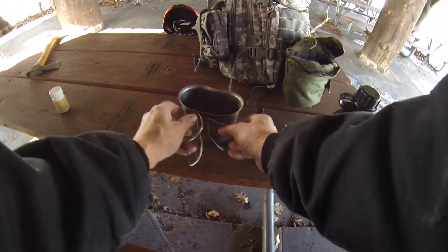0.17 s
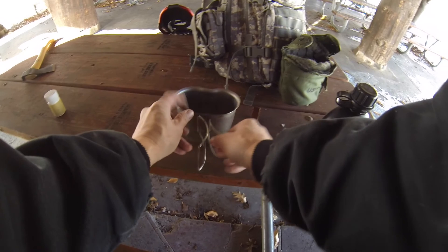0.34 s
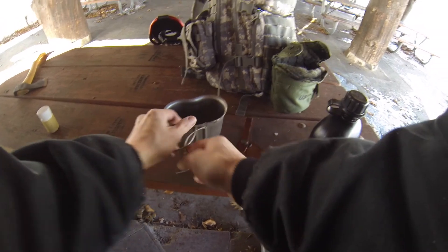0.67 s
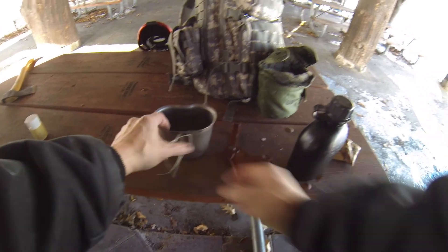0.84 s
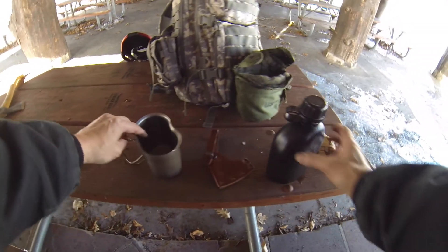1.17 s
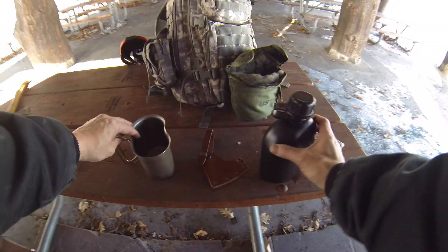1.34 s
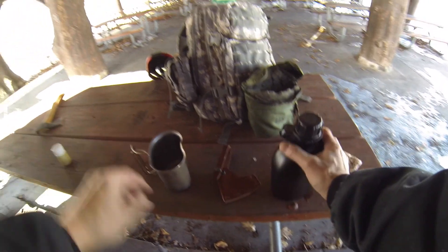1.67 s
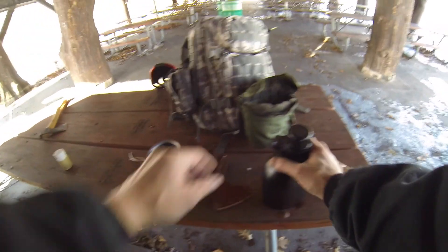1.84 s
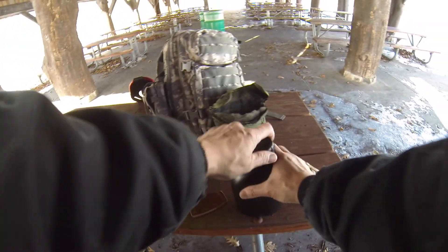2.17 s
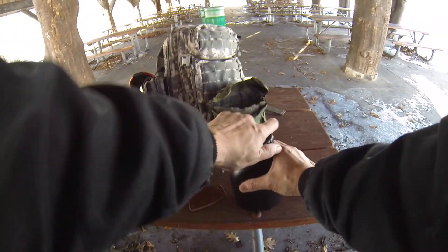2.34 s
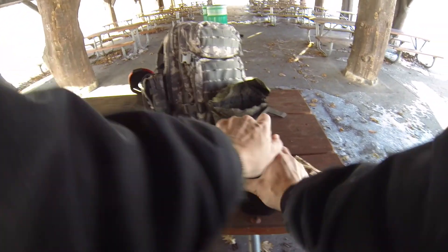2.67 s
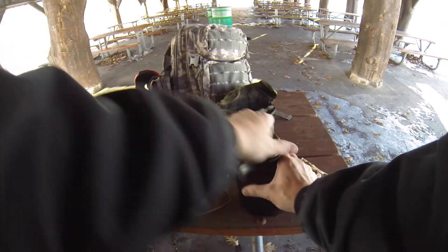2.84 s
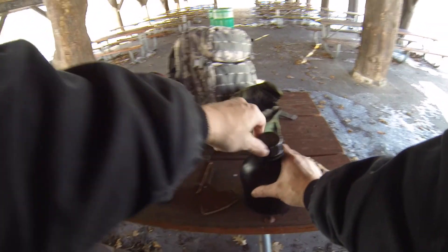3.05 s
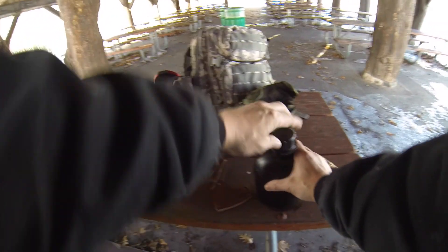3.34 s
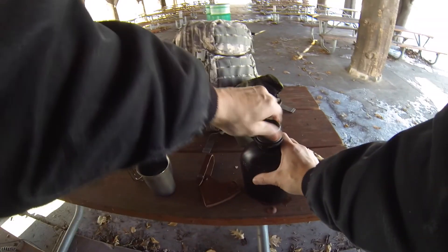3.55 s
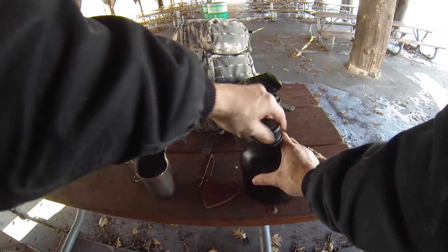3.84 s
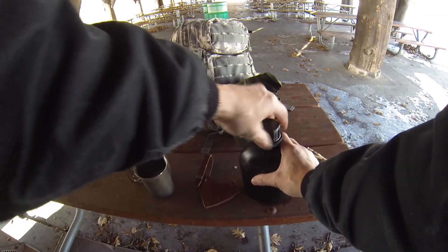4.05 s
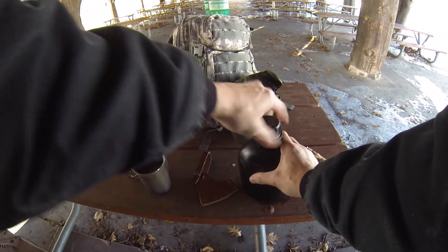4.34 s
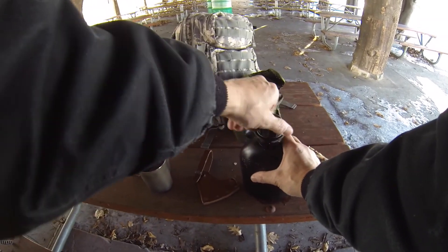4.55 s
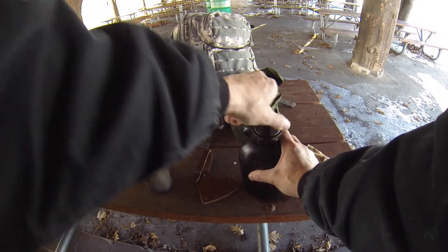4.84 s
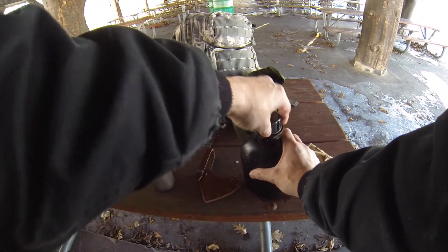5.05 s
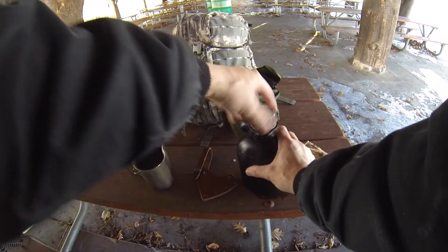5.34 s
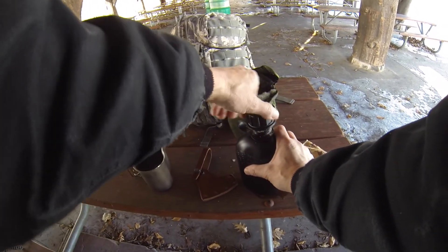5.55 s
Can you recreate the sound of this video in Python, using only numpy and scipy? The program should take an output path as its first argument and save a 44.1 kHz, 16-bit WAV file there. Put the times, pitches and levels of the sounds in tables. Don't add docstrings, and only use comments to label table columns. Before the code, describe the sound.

A metal cup's wire handles clank and scrape, the cup and a full canteen thud onto wood, then a plastic cap cracks loose and is twisted off.

```python
import sys
import numpy as np
from scipy import signal
from scipy.fft import rfft, irfft, next_fast_len
from scipy.io import wavfile
from scipy.ndimage import uniform_filter1d, map_coordinates

SR = 44100
rng = np.random.default_rng(int(sys.argv[2]) if len(sys.argv) > 2 else 0)


def how_loud(loudness_db):
    steps = np.asarray(loudness_db, float) / 20
    return 10 ** steps


def store_pcm(level_fs):
    pcm = np.round(np.clip(level_fs, -1, 1) * 32767).astype(np.int16)
    wavfile.write(sys.argv[1], SR, np.atleast_2d(pcm).T)


N = 251811

# (time [s], level [dB])
BREEZE = [(0.0, -49.5), (0.89, -42), (2.07, -50.5), (2.16, -41), (2.3, -52.5), (2.59, -33), (2.67, -42),
          (3.44, -40.5), (3.5, -57), (3.56, -42), (4.5, -42.5), (5.15, -46), (5.33, -41.5), (5.71, -47.5)]
# (frequency [Hz], level [dB])
GUST_SPECTRUM = [(7.1, -4.5), (14, -2.5), (26, 0), (35, 2.5), (45, -5), (55, -9), (81, -38), (100, -13),
                 (130, -46), (220, -120)]
# (middle [s], level [dB])
SHOVES = [(.02, -47.5), (.35, -44), (.75, -42.5), (.99, -44), (1.53, -47), (1.75, -56), (1.981, -43.5),
          (2.58, -54), (3.1, -48.5), (3.35, -68), (4.02, -51.5), (4.25, -51.5), (4.7, -52), (5.1, -51),
          (5.42, -45), (5.7, -55.5)]
# (frequency [Hz], level [dB])
SHOVE_SPECTRUM = [(35, -31), (60, -8.5), (119, 0), (262, -8), (300, -5.5), (432, -18), (600, -16),
                  (780, -54), (1320, -120)]
# (frequency [Hz], level [dB])
FAR_SPECTRUM = [(35, -50), (60, 6), (92, -11), (181, -11.5), (738, -17.5), (1180, -51), (1800, -29.5),
                (3090, -50), (3810, -42), (7010, -66), (9520, -40), (13200, -74), (15000, -70),
                (15550, -100)]
# (frequency [Hz], gain [dB])
HOUSING = [(40, -2.5), (11000, -2.5), (13500, -1.5), (15200, -6), (16300, -41)]

# (time [s], level [dB])
SLEEVES = [(0.0, -58), (0.2, -59), (0.6, -64), (1.25, -64.5), (1.7, -59.5), (2.1, -56.5), (2.4, -62.5),
           (2.75, -61), (3.1, -66), (3.3, -60), (3.7, -67), (4.2, -65.5), (4.7, -62.5), (5.05, -66),
           (5.3, -62), (5.5, -69), (5.71, -62.5)]
# (middle [s], half length [s], rub [dB], body murmur [dB])
ARM_SWEEPS = [
    (.35, 0.067, -50.5, -58),
    (.75, 0.1, -48, -44.5),
    (1.0, 0.043, -58, -68),
    (1.12, 0.12, -55.5, -66),
    (1.54, 0.089, -60, -60),
    (1.77, 0.038, -58, -61),
    (1.93, 0.04, -56, -50.5),
]
# (middle [s], half length [s], rub [dB], hiss [dB], thread murmur [dB])
CAP_TWISTS = [(2.531, 0.021, -57, -66.5, -48), (2.59, 0.033, -55.5, -67.5, -48.5),
              (2.786, 0.038, -67, -76, -60), (3.1, 0.039, -61.5, -74, -53), (3.337, 0.1, -59, -78, -54),
              (3.455, 0.055, -59.5, -66, -62), (3.782, 0.056, -59.5, -68, -53.5),
              (4.075, 0.029, -57.5, -62.5, -52), (4.401, 0.042, -57, -63.5, -55.5),
              (4.705, 0.053, -61.5, -69, -52.5), (4.814, 0.042, -64, -98, -57),
              (5.05, 0.038, -55.5, -62, -52.5), (5.068, 0.013, -62, -78.5, -44.5),
              (5.106, 0.05, -81, -79, -51.5), (5.36, 0.017, -60, -65, -50),
              (5.408, 0.02, -50, -56.5, -41.5), (5.46, 0.088, -66, -72.5, -51)]
# (frequency [Hz], level [dB])
CLOTH_SPECTRUM = [(590, -41), (1000, 2), (1210, -0.5), (1810, 4), (1980, 0.5), (2790, -4.5), (3910, -6),
                  (5650, -21.5), (6000, -66), (7800, -35), (13200, -120)]
# (frequency [Hz], level [dB])
HISS_SPECTRUM = [(2650, -44), (4500, -2.5), (6120, -2.5), (6820, -5), (7930, -2.5), (8730, -4.5),
                 (9890, -3.5), (14300, -13.5), (15100, -10), (15550, -52)]
# (frequency [Hz], level [dB])
HOLLOW_SPECTRUM = [(210, -34), (350, 0), (503, 3), (549, -1), (784, 2), (961, -1.5), (1230, -11),
                   (1300, -8.5), (1690, -41), (2860, -120)]
# (frequency [Hz], level [dB])
RIDGE_SPECTRUM = [(760, -56), (1300, -4), (2420, 0), (3060, -6.5), (3500, -3), (4700, -17.5), (5500, -40),
                  (7150, -32), (12100, -120)]
# (frequency [Hz], width [Hz], level [dB])
RIM_MODES = [(5070, 64, 3), (6170, 80, 13.5)]

# (time [s], peak [dB], knock [dB], length [s])
PLANK_THUDS = [(0.612, -36, -14, 0.01), (0.978, -38, -24, 0.0095), (1.452, -26.5, -5.5, 0.018),
               (1.49, -36.5, -7, 0.021), (1.524, -43.5, -14, 0.015), (1.919, -29, 0, 0.017),
               (1.942, -32, -11, 0.041), (2.569, -36, -16, 0.013), (2.948, -33.5, -9.5, 0.024),
               (3.087, -33, -14, 0.023), (3.135, -37.5, -25, 0.016)]
# (frequency [Hz], width [Hz], level [dB])
PLANK_MODES = [(113.7, 17.5, 9.5), (181, 84, -4.5), (203, 23, -2), (300, 36, -1), (352, 29, -5),
               (482, 66, -8.5)]

# (frequency [Hz], level lifted [dB], level on the planks [dB], t60 [s])
CUP_MODES = [(560, 1, -37, 0.11), (600, -18, -6.5, 0.35), (693, 12, 7, 0.096), (748, 11, 14, 0.095),
             (982.5, 4, 11, 0.1), (1753, 8.5, -9, 0.17), (1797, -2, 14, 0.14), (1833, 0, -24, 0.34),
             (2080, 2, 11, 0.047), (2490, -4, -15, 0.08), (2597, 2, 10.5, 0.14), (2654, 4, -6, 0.085),
             (2920, -19, -3, 0.12), (3314, -9, 13, 0.07), (3695, 6.5, -25, 0.069), (3720, -16, 13.5, 0.047),
             (4110, -17, -20, 0.029), (4420, 1.5, -28, 0.12), (4150, -6, -26, 0.14), (2140, -6, -14, 0.12),
             (2360, -19, -11, .12), (2860, -26, 4, 0.1), (5830, -9, 3, 0.29), (6290, -7, -9, 0.15),
             (3850, -1.5, -16, 0.11), (4780, -4.5, -19, 0.21), (5000, -5, -8, 0.1), (5400, 2, 11, 0.084),
             (5510, -17.5, 7, 0.18), (5970, -31, 7, 0.2), (7770, 3.5, -1, 0.088), (7440, 1, -3, 0.11),
             (8040, 3, 6.5, 0.17), (8550, -14, -7, 0.03), (9530, 5, 6, 0.087), (9930, 0, 8, 0.11),
             (11300, -10, 10, 0.03)]
# (time [s], peak [dB], low modes [dB], upper modes [dB], treble [dB])
LIFTED_CLANKS = [(.051, -46, -2, -3, -34), (.091, -54, 11.5, -8, -21), (.11, -51, -1, 10.5, -29),
                 (.26, -46, -19, -1, -23), (.277, -38.5, -8, -6, -19), (.285, -39.5, 2.5, 8.5, -3),
                 (.318, -39, 6, -2, -21), (.326, -41, 8.5, 4, -11), (.337, -29, -11, -3, -7),
                 (.349, -22, -16, -0.5, -8), (.356, -29.5, -3, -1, -31), (.364, -37, -8, -4, -13),
                 (.373, -41, 5, -2, -28), (.391, -39, 0, -12, -25), (.421, -42, 0, 3, -4),
                 (.44, -29.5, -9, 3.5, 1.5), (.476, -44, -5, -3, -7), (.491, -46, 7.5, -7, -23),
                 (.497, -38.5, -3, -12, -16), (.51, -54, 11, -3, -20), (.533, -47.5, 7, 11, -16),
                 (.543, -38, 6, 2.5, 4.5), (0.549, -42, -12, 9, 3), (.562, -50, 4, -7, -3),
                 (.606, -36, -6.5, -9, -34), (.622, -41, -11, -2, -10), (.63, -41.5, -8, -7, -11)]
# (time [s], peak [dB], low modes [dB], upper modes [dB], treble [dB])
STANDING_CLANKS = [(0.9327, -42, 1.5, -8, -9), (.944, -40.5, 7, 6, -27), (.951, -44, 3, 0, -27),
                   (.968, -42, 6, 2.5, -29), (.982, -38.5, 6, -3, -2.5), (.998, -37, 1, -17, -29),
                   (1.036, -38.5, 2, -3, -12), (1.047, -35.5, -10, -5, 4), (1.055, -36, -3, 5, -9),
                   (1.076, -43, 2, 1, -8), (1.0897, -27, -1, 4.5, -2), (1.0928, -27.5, -1, -1, 5),
                   (1.0963, -27.5, -9.5, 1, -3.5), (1.112, -42, -7, 7.5, 9), (1.121, -46, -10, 1, 0),
                   (1.567, -49, -12, 0, -2)]
# (time [s], peak [dB], centre [Hz], width [Hz])
HANDLE_SNAPS = [
    (1.0466, -6.5, 3100, 1400),
    (1.0486, -10.5, 2500, 4100),
    (1.0488, -16, 3500, 9100),
    (0.97, -15, 1800, 1200),
    (1.0927, -19, 2600, 6800),
    (1.0985, -20, 4000, 2200),
    (0.32, -20, 2200, 1700),
    (.4395, -26, 4500, 5000),
]
# (time [s], level [dB])
HANDLE_SLIDE = [(0.0, -55), (0.12, -50), (0.346, -57), (0.488, -50.5), (0.744, -52.5), (0.925, -51),
                (0.935, -39), (1.008, -45), (1.02, -71), (1.06, -37.5), (1.12, -50), (1.2, -63)]
# (time [s], peak [dB], frequency [Hz], t60 [s])
CUP_TINKS = [(.109, -44, 3570, 0.035), (.15, -46, 3620, .02), (.164, -40, 775, 0.055),
             (.175, -57, 7600, .02), (.07, -50, 780, .05), (.284, -54, 5080, .04), (.285, -49, 2930, .04),
             (.285, -51, 8300, .04), (.286, -45, 1210, .04), (.348, -43, 9000, .04),
             (.348, -50, 10400, .03), (.352, -52, 4780, .12), (.44, -44, 8400, .05), (.44, -41, 5600, .05),
             (.441, -36, 2670, .05), (.441, -39, 3660, 0.088), (.474, -53, 2150, .04),
             (.504, -42, 960, 0.065), (.504, -39, 600, .06), (.546, -38.5, 1847, 0.16),
             (.547, -51, 8700, .04), (.549, -56, 6720, .03), (.556, -53, 4780, 0.072),
             (.627, -41, 3710, 0.056), (.548, -44, 980, .12), (.945, -32, 950, 0.083),
             (.966, -49, 2410, .05), (.981, -40, 2840, .04), (.997, -38, 2410, .07),
             (1.047, -50, 8300, .02), (1.058, -37, 730, .08), (1.056, -35.5, 1797, 0.16),
             (1.079, -38, 720, 0.065), (1.096, -35, 1802, 0.093), (1.113, -50, 6250, .04),
             (1.135, -43, 690, .05), (1.573, -50, 1710, .2)]

# (frequency [Hz], width [Hz], level [dB])
CAP_MODES = [(1900, 254, 3), (2626, 106, 2.5), (3230, 1740, -2), (3890, 550, 2), (4150, 150, -2),
             (5026, 145, 3.5), (6500, 940, -6), (1623, 130, -8.5)]
# (time [s], peak [dB], hollow knock [dB], knock [Hz])
PAD_KNOCKS = [(2.3254, -55, 7.5, 750), (2.7535, -63.5, 14, 680), (3.05, -62, 16.5, 660),
              (3.642, -47, 1, 684), (3.918, -48, 5, 654), (3.9634, -50, 1, 690), (3.9794, -57.5, 13, 884),
              (3.997, -61, 19.5, 470), (4.1866, -36, 5, 598), (5.0535, -52, 8, 840), (5.0942, -55, 10, 445),
              (5.2676, -44, 1.5, 452), (5.284, -62.5, 18, 510), (5.4047, -51, 12, 935),
              (5.5039, -61, 11, 456), (5.0645, -52.5, 13.5, 895), (5.2715, -59, 11, 980),
              (5.4845, -61, 10, 870), (4.098, -58.5, 12, 870), (4.408, -53.5, 10.5, 960)]
# (time [s], peak [dB], hollow knock [dB], knock [Hz])
THREAD_CLICKS = [
    (4.09, -59, 7, 790),
    (4.2507, -41, -4, 920),
    (4.401, -42, 0.5, 937),
    (4.662, -53.5, 5, 748),
    (4.7014, -60, 2, 649),
    (4.9232, -59, -8, 770),
    (5.3211, -49, 7.5, 472),
    (5.6826, -64, 15, 422),
]
# (time [s], peak [dB], hollow knock [dB], treble [dB])
RIM_TICKS = [(2.5222, -55, 4.5, 2), (2.575, -62, -5, -5), (3.3423, -66, -10, 7), (3.3751, -57, 4, 8),
             (3.627, -62, -6, -1), (5.0385, -51, -8, -8), (5.392, -58, -10, -10), (4.244, -56, 7, -4),
             (4.937, -53, 8, 13), (5.3872, -55, -7, 7), (5.4166, -39.5, 5.5, 4)]
# (time [s], peak [dB], hollow knock [dB], treble [dB], crown mode [dB])
SEAL_CRACKS = [
    (3.2715, -17.5, -14.5, -26, -10),
    (3.2724, -16, -14, -37, -5),
    (3.2753, -21.5, -19, -35, -7),
    (4.494, -43.5, -15, 6.5, -8),
    (4.4944, -20.5, -15, -19, -9),
]
# (time [s], peak [dB], frequency [Hz], length [s])
SHOULDER_BUMPS = [
    (5.054, -40, 336, 0.0015),
    (5.324, -34, 300, 0.011),
    (5.414, -28, 279, 0.003),
    (5.425, -34, 364, 0.022),
    (5.485, -49, 480, 0.0027),
    (5.498, -36, 380, 0.0086),
    (5.102, -39, 460, 0.012),
    (5.376, -50, 420, 0.0054),
    (5.389, -35, 300, .006),
]
# (delay [s], level [dB])
NEAR_ECHOES = [(.0036, -32), (.0068, -32)]
# (time [s], peak [dB], frequency [Hz],
# t60 [s])
PLASTIC_POPS = [(2.3252, -37, 1700, 0.0049), (3.272, -24, 4900, .015), (3.272, -42, 5900, .01),
                (3.272, -42, 7350, .01), (3.279, -36, 567, .045), (3.2716, -17, 1860, .013),
                (3.27565, -19, 1880, .016), (4.0903, -36, 800, 0.0087), (4.1866, -42, 3700, .012),
                (4.2506, -46, 5560, 0.013), (4.251, -40, 2080, 0.024), (4.4942, -26.5, 1930, 0.02),
                (4.497, -45.5, 2600, .07), (4.497, -53, 4200, 0.065), (4.4942, -44, 10100, .008),
                (5.037, -46, 2480, .03), (5.0506, -20, 650, 0.008), (5.0595, -38, 790, .01),
                (5.2672, -26.5, 1500, 0.004), (5.324, -47, 2900, .008), (5.3205, -38, 750, .015),
                (5.374, -45, 1030, .02), (5.389, -45, 7840, .015), (5.415, -43, 4800, .015),
                (5.416, -36, 1350, 0.013), (1.727, -42, 600, 0.066), (2.585, -42, 700, .02)]

BUFFET_DB, FLUTTER_DB = 4.5, 1.2
SHOVE_S, STILL_DB, FAR_DB = 0.12, -56, -53.5
REST_DB, HISS_DB, MURMUR_DB = -62, -73.5, -59.5
HISS_FOLLOWS, MURMUR_FOLLOWS = 0.088, 0.19
SWEEP_HISS_DB = -13.5
DOWN_S, PLANK_DAMPS = 0.9, 0.66
WALL_HELD_DB, WALL_FREE_DB, WALL_FOLLOWS = -3.5, 0.5, 1
CHATTER_S, DULL_LASTS = 0.0037, 0.032
PAD_TREBLE_DB, THREAD_TREBLE_DB, RIM_HZ, SEAL_HZ = -15, -2.5, 480, 580
PAD_CROWN_DB, THREAD_CROWN_DB, RIM_CROWN_DB = -7.5, 0.5, 3.5
SKID_S = 0.0013
RISE_CYCLES = 0.7


def unit(x):
    return x / np.sqrt(np.mean(x ** 2) + 1e-20)


def click(length):
    return np.eye(1, length)[0]


def along(points, hz):
    f, value = np.transpose(points)
    return np.interp(np.log(hz + 1), np.log(f + 1), value)


def level_curve(rows):
    s, db = np.transpose(rows)
    return np.interp(np.arange(N) / SR, s, db, right=-120 if s[-1] < 2 else db[-1])


def swells(rows):
    t = np.arange(N) / SR
    total = 0
    for s, half, *level_db in rows:
        bell = np.exp(-((t - s) / half) ** 2 * 2)
        total = total + how_loud(2 * np.array(level_db))[:, None] * bell
    return total


def wobble(rate):
    knots = rng.standard_normal(int(N * rate / SR) + 4)
    return map_coordinates(knots, [np.arange(N) * rate / SR])


def filtered(x, response):
    m = next_fast_len(len(x) + 8192)
    return irfft(rfft(x, m) * response(np.fft.rfftfreq(m, 1 / SR)), m)[:len(x)]


def resonances(modes):
    def response(f):
        total = 0
        for k, (c, w, db) in enumerate(modes):
            total = total + (-1) ** k * how_loud(db) * 1j * f * w / (c * c - f * f + 1j * f * w)
        return total
    return response


def rush(spectrum, grain_db, rate):
    lumps = how_loud(grain_db * wobble(rate)) * rng.standard_normal(N)
    return unit(filtered(lumps, lambda f: how_loud(along(spectrum, f))))


def chatter(length, grain_db):
    u = np.arange(1, 4097) / SR / max(length, 1e-4)
    sizes = how_loud(grain_db * rng.standard_normal(len(u))) * rng.standard_normal(len(u))
    run = sizes * np.exp(-u) * (1 - np.exp(-u * 6))
    return run / np.linalg.norm(run)


def add(track, sound, s):
    part = track[round(s * SR):][:len(sound)]
    part += sound[:len(part)]


def rings(rows):
    out, t = np.zeros(N), np.arange(SR // 5) / SR
    for s, db, ring_hz, t60 in rows:
        decay = how_loud(db - 60 * t / max(t60, 1e-3))
        rise = 1 - np.exp(-t * ring_hz / RISE_CYCLES)
        add(out, decay * rise * np.sin(2 * np.pi * ring_hz * t), s)
    return out


def distant_air():
    return how_loud(FAR_DB) * rush(FAR_SPECTRUM, grain_db=0.7, rate=8)


def breeze():
    level_db = level_curve(BREEZE) + BUFFET_DB + FLUTTER_DB * wobble(8.7)
    return how_loud(level_db) * rush(GUST_SPECTRUM, grain_db=2.5, rate=6)


def handling():
    shoves = swells([(s, SHOVE_S, db) for s, db in SHOVES])[0]
    return np.sqrt(how_loud(2 * STILL_DB) + shoves) * rush(SHOVE_SPECTRUM, grain_db=3.0, rate=25)


def hands():
    effort_db = level_curve(SLEEVES)
    sweep, boom = swells(ARM_SWEEPS)
    twist, grit, thread = swells(CAP_TWISTS)
    over_rest_db = effort_db - REST_DB
    rub = np.sqrt(how_loud(2 * effort_db) + sweep)
    hiss = np.sqrt(how_loud(2 * (HISS_DB + HISS_FOLLOWS * over_rest_db)) + how_loud(2 * SWEEP_HISS_DB) * sweep)
    hollow = np.sqrt(how_loud(2 * (MURMUR_DB + MURMUR_FOLLOWS * over_rest_db)) + boom + thread)
    cloth = rub * rush(CLOTH_SPECTRUM, grain_db=1.5, rate=150)
    cloth = cloth + hiss * rush(HISS_SPECTRUM, grain_db=1.5, rate=260)
    skin = rush(HISS_SPECTRUM, grain_db=4.0, rate=270)
    fingers = np.sqrt(grit) * (skin + filtered(skin, resonances(RIM_MODES)))
    murmur = hollow * rush(HOLLOW_SPECTRUM, grain_db=2, rate=60)
    ridges = np.sqrt(twist) * rush(RIDGE_SPECTRUM, grain_db=2.0, rate=160)
    return cloth + fingers + ridges + murmur


def table():
    deep, high = np.zeros(N), np.zeros(N)
    for s, db, knock_db, length in PLANK_THUDS:
        blow = 0.92 * click(4096) + 1.6 * chatter(length, grain_db=8.0)
        add(deep, how_loud(db + 41.0) * blow, s + 0.00382)
        add(high, how_loud(db + knock_db + 43) * chatter(length / 3, grain_db=4), s)
    knock_modes = [(332, 44, -1), (480, 64, -4.5), (635, 100, 5), (770, 140, 2)]
    both = filtered(deep, resonances(PLANK_MODES)) + filtered(high, resonances(knock_modes))
    return filtered(both, lambda f: 1 / (1 + 1j * f / 900) ** 3)


def cup_modes():
    hz, lifted_db, down_db, t60 = np.transpose(CUP_MODES)
    return hz, lifted_db, down_db, t60 / (1 + (hz / 4800) ** 2)


def cup_clanks():
    out, t = np.zeros(N), np.arange(SR // 5) / SR
    hz, lifted_db, down_db, t60 = cup_modes()
    for s, db, low_db, upper_db, treble_db in LIFTED_CLANKS + STANDING_CLANKS:
        lifted = s < DOWN_S
        wall_db = (WALL_HELD_DB if lifted else WALL_FREE_DB) + WALL_FOLLOWS * low_db
        place = [(1100, low_db), (1700, wall_db), (1900, wall_db), (2300, 0), (3000, 0), (3250, upper_db),
                 (4600, upper_db), (7000, treble_db), (10500, treble_db), (15000, treble_db - 17)]
        chance = rng.standard_normal((2, len(hz)))
        gains = how_loud((lifted_db if lifted else down_db) + 3 * chance[0])
        gains = gains / np.linalg.norm(gains) * how_loud(along(place, hz))
        run = chatter(CHATTER_S * np.exp(-DULL_LASTS * treble_db), grain_db=5.5)
        drive = uniform_filter1d(abs(rfft(run)) ** 2, size=7)
        gains = gains / np.sqrt(np.interp(hz, np.fft.rfftfreq(len(run), 1 / SR), drive) + 0.14)
        rings_s = t60 * (1 if lifted else PLANK_DAMPS)
        mode_hz = hz * (1 + 0.0046 * chance[1])
        ring = gains @ (how_loud(-60 * t / rings_s[:, None]) * np.sin(2 * np.pi * mode_hz[:, None] * t))
        burst = how_loud(-60 * t / 0.0059) * rng.standard_normal(len(t))
        crack = filtered(burst, lambda f: how_loud(along(place, f)) * (f > 400))
        add(out, how_loud(db + 4.0) * signal.fftconvolve(ring + 0.77 * crack, run), s)
    return out


def handle_snaps():
    out = np.zeros(N)
    for s, db, centre_hz, width_hz in HANDLE_SNAPS:
        snap = filtered(click(512), lambda f: resonances([(centre_hz, width_hz, 0)])(f) ** 2)
        add(out, how_loud(db + 10.0) * snap, s)
    return out


def handle_scrape():
    hz, lifted_db, down_db, t60 = cup_modes()
    span = round(HANDLE_SLIDE[-1][0] * SR)
    friction = (how_loud(3.5 * wobble(120)) * rng.standard_normal(N))[:span]

    def through_wall(mode_db):
        wide = [(f, 9 / decay, db - f / 350) for f, db, decay in zip(hz, mode_db, t60)]
        return unit(filtered(friction, resonances(wide)))

    scrape = np.where(np.arange(span) < DOWN_S * SR, through_wall(lifted_db), through_wall(down_db))
    out = np.zeros(N)
    add(out, how_loud(level_curve(HANDLE_SLIDE)[:span] - 2.5) * scrape, 0)
    return out


def cup():
    return cup_clanks() + handle_snaps() + handle_scrape() + rings(CUP_TINKS)


def taps():
    pads = [(*row, PAD_TREBLE_DB, PAD_CROWN_DB) for row in PAD_KNOCKS]
    threads = [(*row, THREAD_TREBLE_DB, THREAD_CROWN_DB) for row in THREAD_CLICKS]
    rim = [(s, db, knock_db, RIM_HZ, treble_db, RIM_CROWN_DB) for s, db, knock_db, treble_db in RIM_TICKS]
    seal = [(s, db, knock_db, SEAL_HZ, *rest) for s, db, knock_db, *rest in SEAL_CRACKS]
    return pads + threads + rim + seal


def cap_taps():
    out, blow = np.zeros(N), click(4096)
    dull = lambda f: 1 / (1 + 1j * f / 6000) ** 2
    for s, db, knock_db, knock_hz, treble_db, crown_db in taps():
        snap = [(c, w, g + crown_db * (c < 2200 or c > 6000)) for c, w, g in CAP_MODES]
        hard = [(5300, 1400, treble_db - 7.0), (8140, 9600, treble_db - 8)]
        stiff = lambda f: resonances(snap)(f) / (1 + 1j * f / 7500) ** 3 * 1j * f / (1200 + 1j * f)
        edge = lambda f: resonances(hard)(f) / (1 + 1j * f / 12000) ** 4
        neck = lambda f: (resonances([(knock_hz, 90, knock_db + 17)])(f)
                          * resonances([(knock_hz, 420, 0)])(f))
        tap = how_loud(db + 29.0) * filtered(blow, lambda f: stiff(f) + neck(f))
        clutter = how_loud(-9) * chatter(0.003, grain_db=4)
        skid = clutter * np.exp(-np.arange(len(blow)) / SR / SKID_S)
        tap = tap + how_loud(db + 31.5) * filtered(skid / np.linalg.norm(skid), edge)
        back = clutter + sum(how_loud(g) * np.roll(blow, round(lag * SR)) for lag, g in NEAR_ECHOES)
        add(out, tap + filtered(signal.fftconvolve(tap, back)[:4096], dull), s)
    return out


def shoulder_bumps():
    out = np.zeros(N)
    for s, db, bump_hz, length in SHOULDER_BUMPS:
        modes = [(bump_hz, 90, 0), (bump_hz * 1.35, 110, -4)]
        shell = lambda f: resonances(modes)(f) / (1 + 1j * f / 900)
        add(out, how_loud(db + 45.5) * filtered(chatter(length, grain_db=-3), shell), s)
    return out


def canteen_cap():
    return cap_taps() + shoulder_bumps() + rings(PLASTIC_POPS)


def scene():
    close = cup() + table() + canteen_cap() + hands()
    background = breeze() + handling() + distant_air()
    return (close + background)[None]


def top_cut(x):
    return signal.sosfilt(signal.butter(12, 16470, fs=SR, output="sos"), x)


def record(dry):
    muffled = filtered(dry[0], lambda f: how_loud(along(HOUSING, f)))
    return top_cut(muffled[None])


dry = scene()
out = record(dry)
store_pcm(out)
```